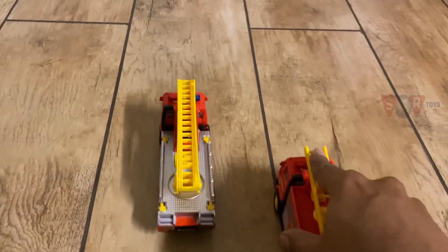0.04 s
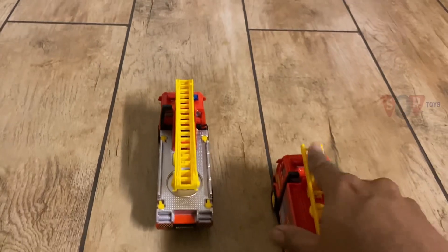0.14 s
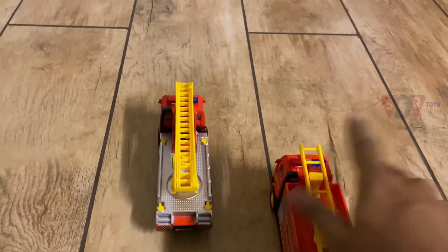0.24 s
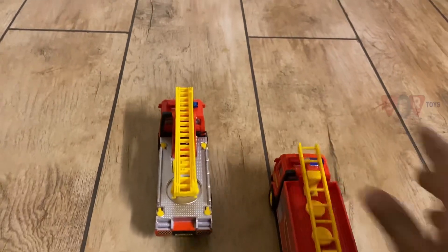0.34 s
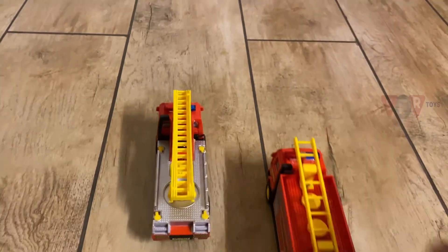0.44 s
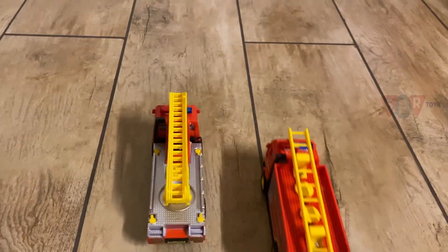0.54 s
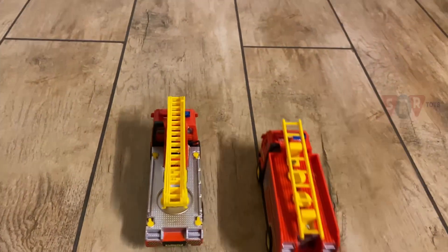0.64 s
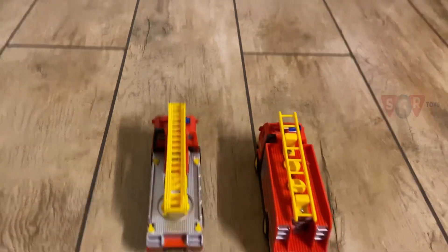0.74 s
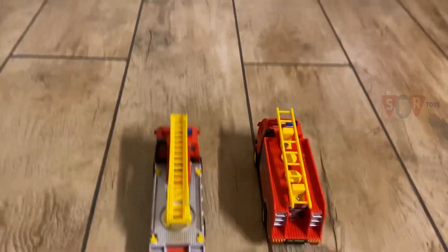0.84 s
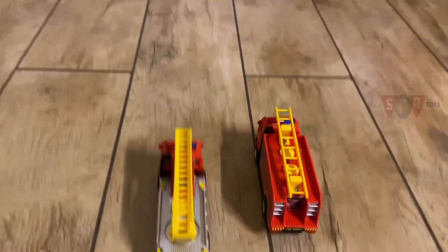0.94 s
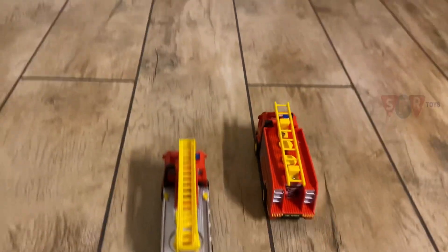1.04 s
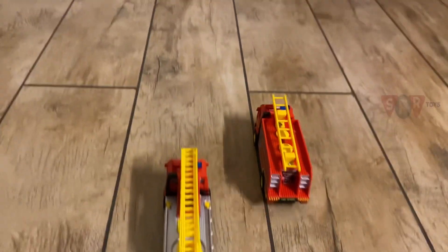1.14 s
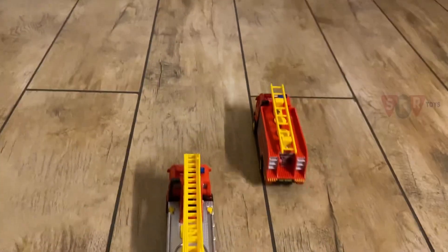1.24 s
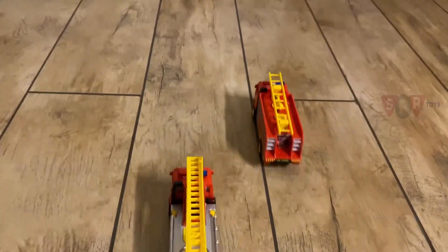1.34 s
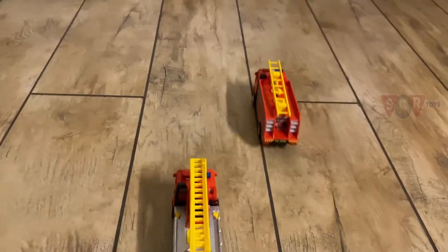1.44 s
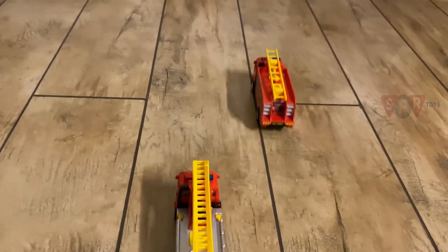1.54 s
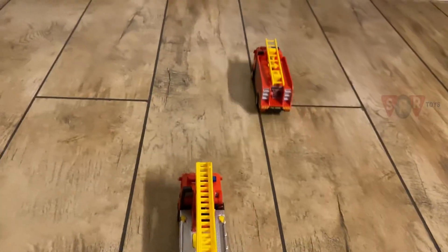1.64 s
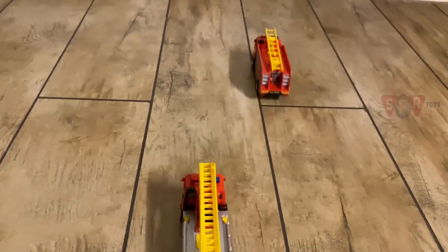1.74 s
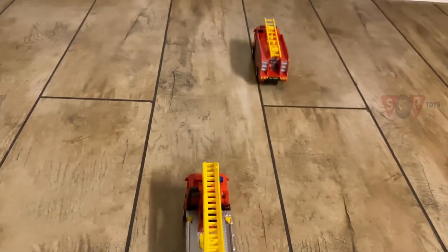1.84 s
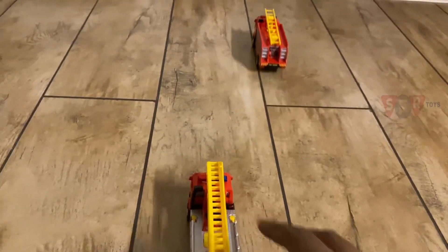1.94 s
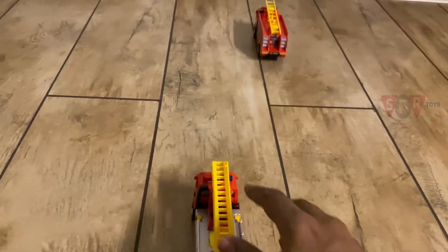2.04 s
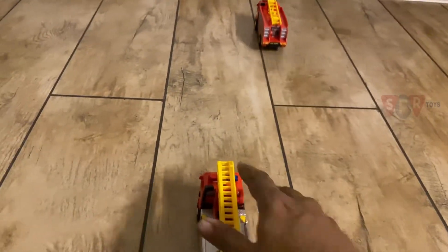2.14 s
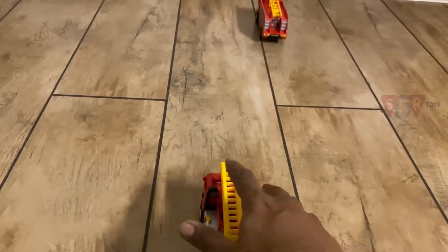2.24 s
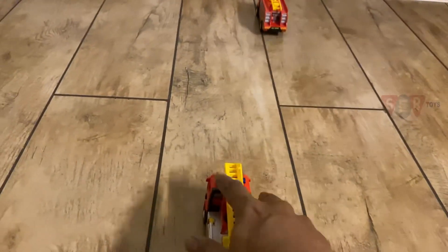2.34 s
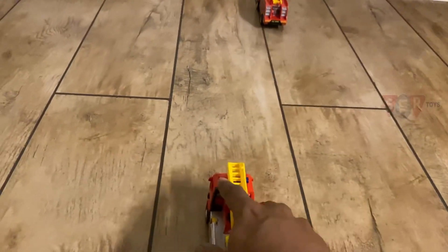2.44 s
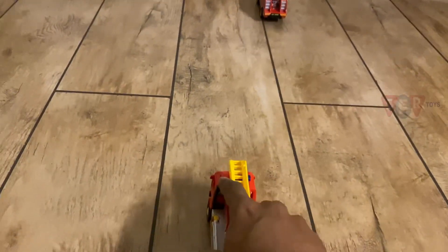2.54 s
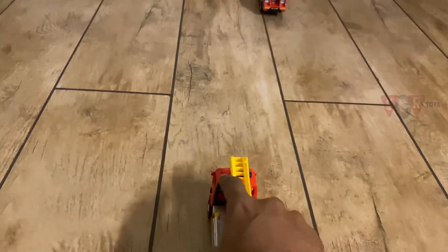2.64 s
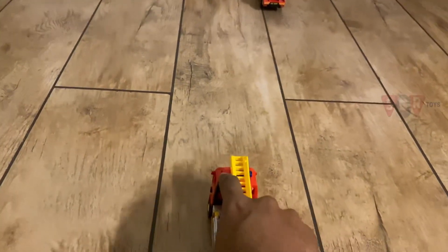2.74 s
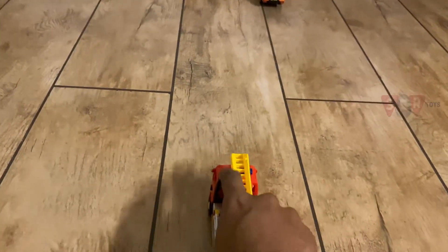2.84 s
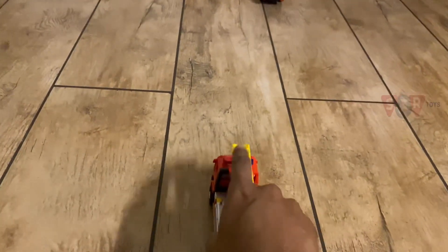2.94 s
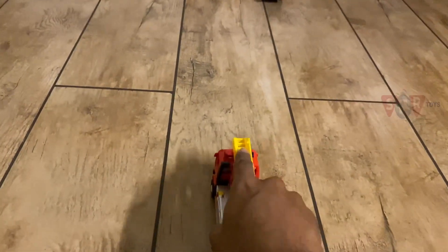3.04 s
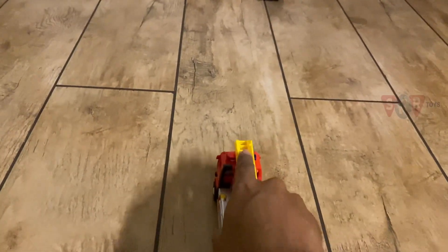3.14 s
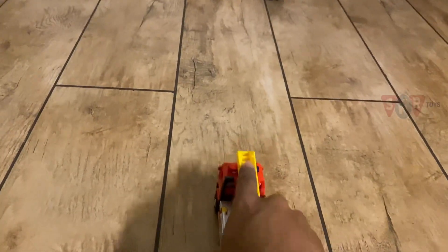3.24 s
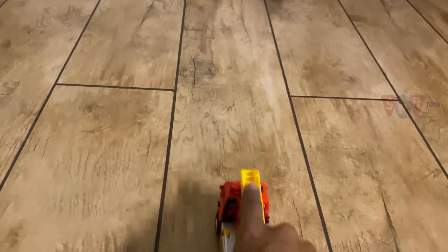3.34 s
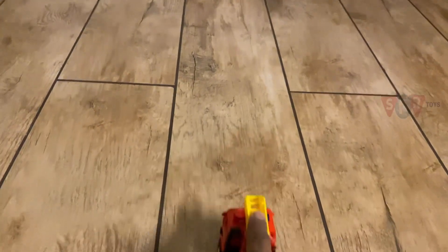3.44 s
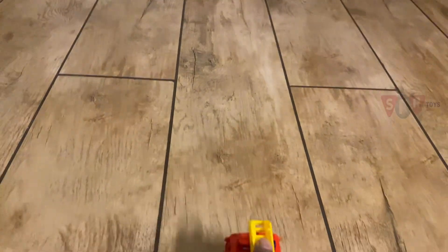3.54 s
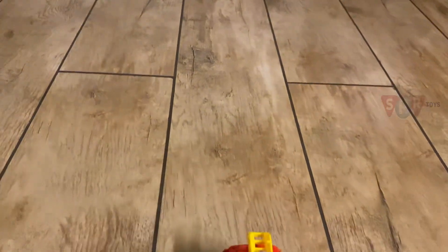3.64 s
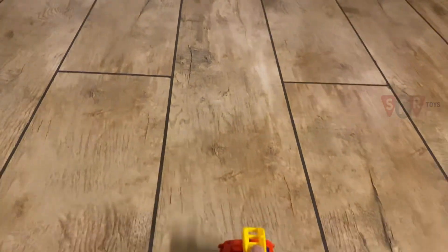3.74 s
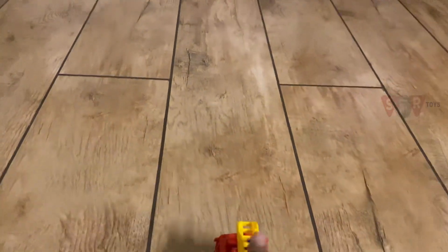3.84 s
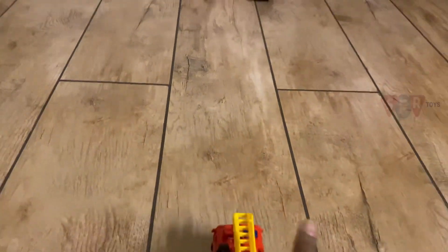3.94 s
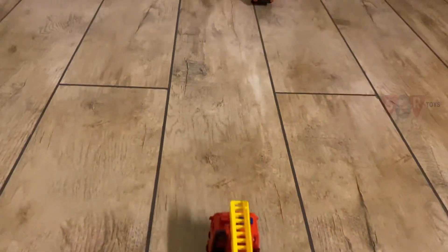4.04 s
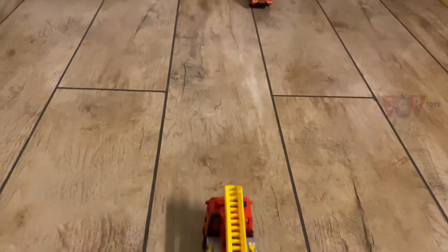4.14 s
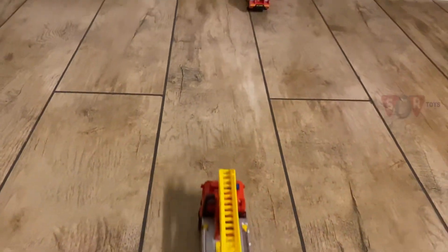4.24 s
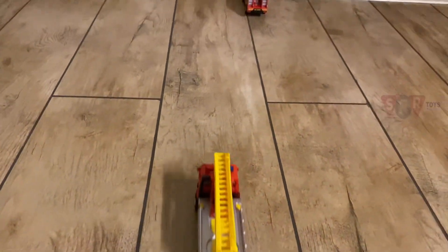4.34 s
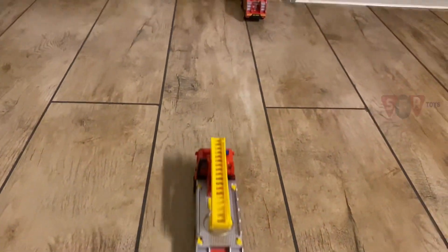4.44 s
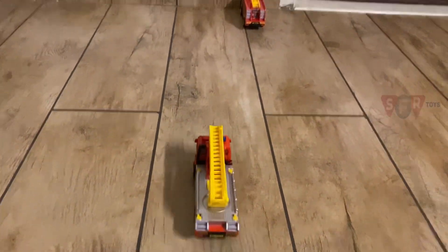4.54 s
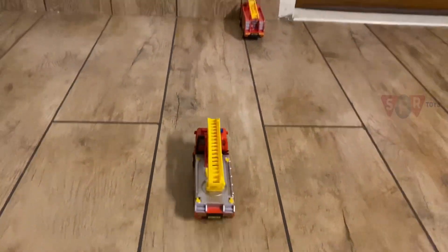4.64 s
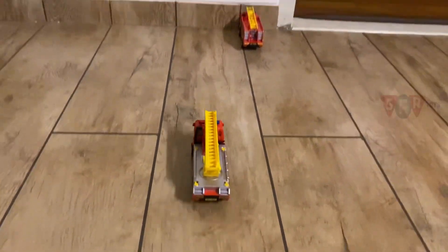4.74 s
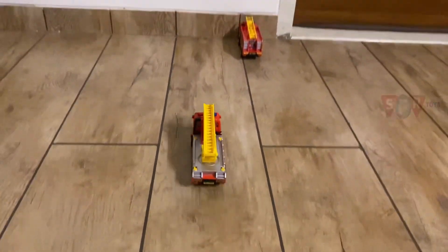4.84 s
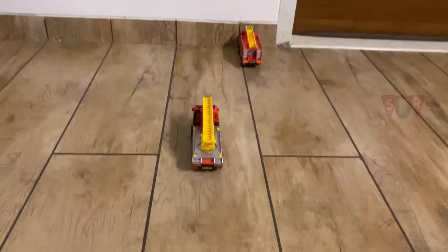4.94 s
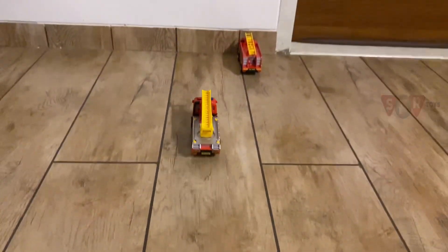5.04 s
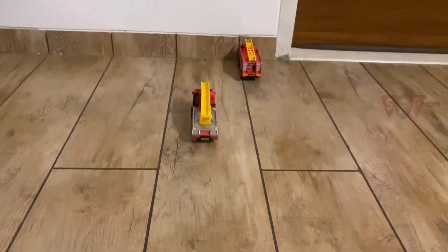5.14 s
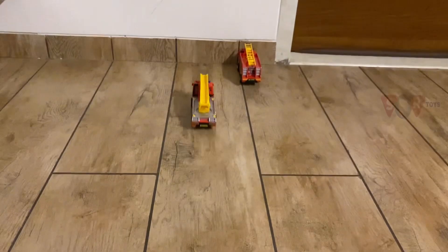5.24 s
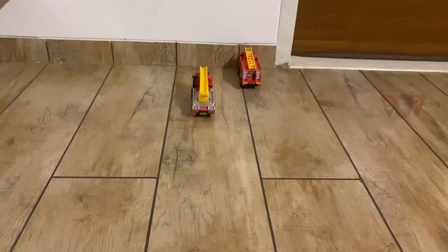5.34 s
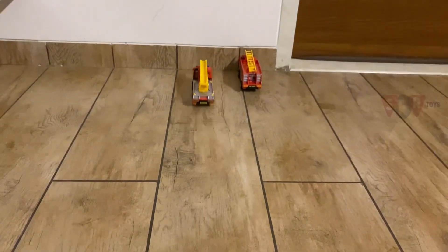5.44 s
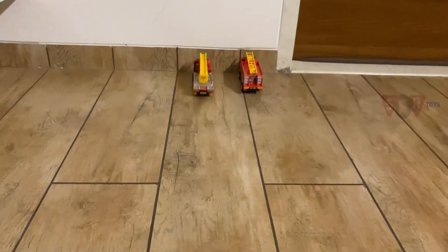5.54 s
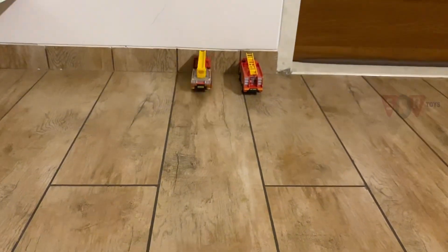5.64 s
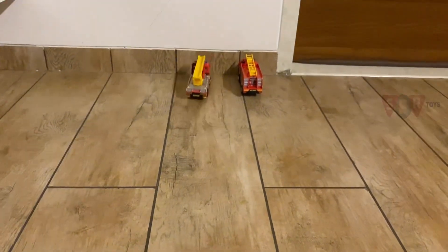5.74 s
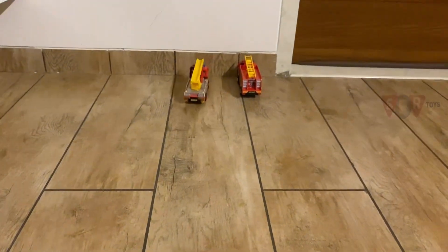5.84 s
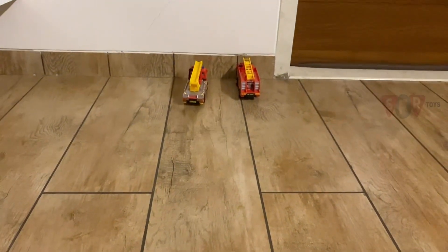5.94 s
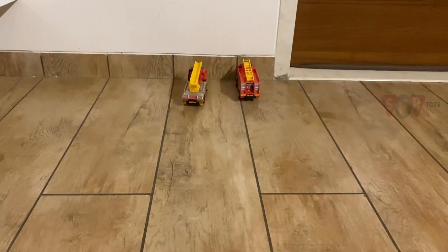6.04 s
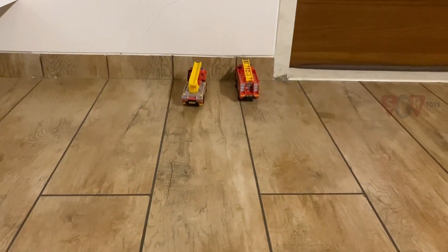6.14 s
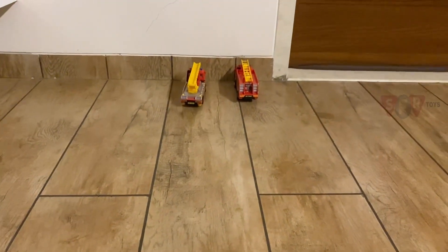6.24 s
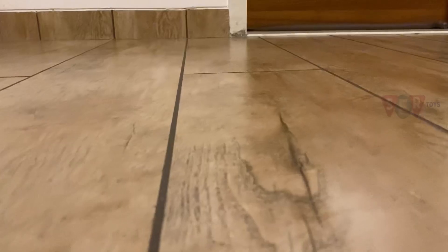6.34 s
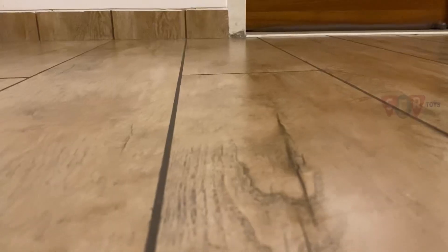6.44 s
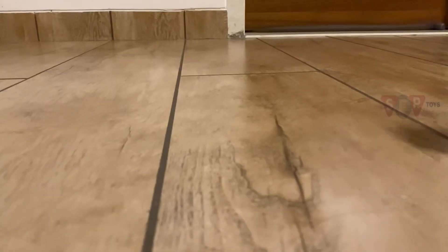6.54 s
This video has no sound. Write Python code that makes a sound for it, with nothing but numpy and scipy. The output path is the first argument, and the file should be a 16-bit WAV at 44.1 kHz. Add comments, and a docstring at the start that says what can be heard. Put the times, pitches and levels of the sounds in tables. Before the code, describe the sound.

Indoor toy truck runs on floor tiles: first loose, uneven clacking with bright gear ticks, slowing to single clicks; next a short burst of winding ratchet and a small release click; then a tighter, damped rattle ending in a hard plastic crack with short room echo. Faint low room rumble lies underneath. Finally a low, smoother roll starts, leaning right.

```python
"""Pull-back toy trucks on tiles

Two toy trucks on a tiled floor in a hard room, close to a two-port phone microphone. The first rattles
away; the second is pressed, wound back, let go and knocks into the skirting. At the end a third run
starts, heard from floor level. Clicks are short modal rings with bright noise ticks, rolling is dense
chatter plus smooth noise, and the room is a tail of sparse echoes. Filtered noise gives a low rumble,
which stops just before the third run, and quiet air throughout."""
import sys
import numpy as np
from scipy import signal
from scipy.fft import rfft, irfft
from scipy.io import wavfile
from scipy.ndimage import uniform_filter1d

SR = 44100
rng = np.random.default_rng(int(sys.argv[2]) if len(sys.argv) > 2 else 0)


def decibels_to_gain(level_db):
    """Convert a level in decibels to a linear amplitude gain (20 dB per decade)."""
    exponent = np.asarray(level_db, float) / 20
    return 10 ** exponent


def materialize(psi):
    """Save the field psi as 16-bit PCM at rate SR to the path in sys.argv[1].

    A 1-D psi becomes a single channel; in a 2-D psi each row is a channel.
    """
    bounded = np.clip(np.atleast_2d(psi).T, -1, 1)
    quanta = np.round(bounded * 32767).astype(np.int16)
    wavfile.write(sys.argv[1], SR, quanta)


N = 291060  # samples
GRAIN = 2048  # samples in one ring, tick or pulse

# three low bands of the background: (t/s, deep level/dB, hum level/dB, low-mid level/dB)
RUMBLE = [(0.0, -78, -75, -76.5), (0.14, -70, -81, -81), (0.2, -53.5, -72, -88), (0.27, -50, -78, -72.5),
          (0.65, -64, -68.5, -77), (1.65, -66.5, -70, -68.5), (2.3, -66, -68.5, -72),
          (2.75, -63.5, -68.5, -82), (2.87, -62, -70, -72), (3.2, -72, -71, -82.5), (3.4, -59, -63.5, -63),
          (3.65, -70.5, -65.5, -81.5), (3.9, -61.5, -68.5, -73), (4.44, -64.5, -64, -71.5),
          (4.9, -67, -64.5, -85), (5.63, -68.5, -59.5, -77), (5.8, -63.5, -70, -76), (6.03, -64, -60, -79),
          (6.28, -67.5, -76.5, -82.5), (6.33, -72, -81, -78.5)]
# colour of the quiet air: (f/Hz, relative level/dB)
AIR_COLOUR = [(120, -33.5), (200, 6.5), (299, 6), (360, -30.5), (612, -31), (659, -7.5), (1840, -14.5),
              (16000, -29.5)]
AIR_DB = -78.5
# how fast the room dies away: (f/Hz, t60/s)
ROOM_DECAY = [(100, 1), (260, 0.3), (700, 0.53), (1840, 0.48), (4850, 0.51), (12800, 0.33)]

# likeness of the two microphone ports: (f/Hz, likeness 0 to 1)
PORT_LIKENESS = [(60, .9), (200, .88), (500, .4), (1400, .65), (3000, .7), (5500, .4), (7600, .96),
                 (16000, .96)]
# phase by which the left port leads: (f/Hz, phase/rad)
LEFT_LEAD = [(0, 0), (1300, -.2), (3500, .9), (6600, -.2), (7700, -1.3), (8500, -np.pi), (9300, -5),
             (11000, -6.6), (12300, -8.2), (13500, -3 * np.pi), (14600, -10.8), (17000, -13)]
# level of the left port over the right: (f/Hz, level/dB)
LEFT_OVER_RIGHT = [(60, 3.5), (160, 1), (450, 2), (1400, 1.5), (3000, 1), (5500, 3.5), (8000, 0),
                   (16000, 0)]

# body resonances before detuning and damping: (f/Hz, width/Hz, level/dB)
FIRST_TRUCK = [(574, 200, -17.5), (880, 330, -2.5), (1109, 81, 1), (1391, 35, 4), (1573, 35, -3.5),
               (1798, 123, -2), (2380, 54, -5.5), (2675, 133, 3), (3320, 100, -11.5), (5140, 250, -33),
               (6900, 1100, -2)]
# chassis of the second truck: (f/Hz, width/Hz, level/dB)
SECOND_CHASSIS = [(811, 31, -3), (1348, 200, 10), (2010, 87, 1.5), (2440, 67, 2.5), (2860, 99, 4),
                  (4500, 73, -11), (5700, 590, -22), (7000, 260, -16)]
# the second truck's shell, heard while winding: (f/Hz, width/Hz, level/dB)
SECOND_SHELL = [(1190, 100, -2.5), (1630, 140, 8), (2200, 480, -1.5), (2740, 570, -1), (4520, 160, 0.5),
                (7360, 330, -5)]
# the truck of the third run: (f/Hz, width/Hz, level/dB)
THIRD_TRUCK = [(163, 91, -1), (456, 120, 8.5), (1340, 850, -2.5), (2490, 95, -3.5), (3540, 340, -2.5),
               (5900, 700, -17.5), (6200, 450, -11)]
# bumper on the skirting: (f/Hz, width/Hz, level/dB)
BUMPER = [(1370, 150, -6), (1680, 550, 1.5), (2120, 230, -6.5), (2870, 250, 1.5), (4580, 260, -12.5),
          (7200, 500, -21.5)]

# colour of hard plastic on plastic: (f/Hz, relative level/dB)
TICK_COLOUR = [(300, -26.5), (1000, -7.5), (2500, -3), (4000, -1), (7000, -3), (10500, -3), (12500, -8),
               (14500, -7.5), (16000, -13.5), (17000, -58.5)]
# what the knock sends into the room: (f/Hz, relative level/dB)
CRASH_COLOUR = [(100, -23.5), (160, -7.5), (300, -11.5), (600, -19), (1050, -12.5), (1180, 4), (1400, -5),
                (1670, 2), (1950, -6.5), (2300, -6.5), (2650, -2.5), (2910, 4), (3150, -4), (3700, -7.5),
                (4520, -1.5), (4700, -4), (4910, -5.5), (6800, -10.5), (10500, -10), (13000, -15.5),
                (16000, -27.5), (17000, -68)]

# loudest clacks, wheels jolting on the tiles and the hand on the body:
# (t/s, ring level/dB, tick level/dB, favoured f/Hz)
FIRST_CLICKS = [(0.093, -51, -73, 930), (0.104, -41, -53.5, 1370), (0.637, -46, -73, 1390),
                (0.705, -44, -56.5, 2550), (0.724, -46.5, -65, 1400), (0.782, -47, -61, 2680),
                (0.813, -46, -57, 1430), (0.869, -55, -67, 1370), (0.899, -40, -68, 1440),
                (0.963, -41.5, -62, 1380), (1.001, -39.5, -54, 1410), (1.028, -38.5, -61, 2440),
                (1.049, -40, -61, 2770), (1.067, -41, -61, 2790), (1.092, -40.5, -70, 2750),
                (1.1, -38, -55, 2450), (1.118, -35, -54, 2680), (1.243, -44, -57, 2530),
                (1.288, -37.5, -61, 1780), (1.303, -31.5, -51.5, 2700), (1.333, -36, -61, 1370),
                (1.356, -42, -58, 2710), (1.384, -44, -52, 1420), (1.445, -37, -59, 2660),
                (1.495, -43.5, -62, 2710), (1.528, -43, -62, 1430), (1.557, -39.5, -60, 2770),
                (1.62, -33.5, -55, 2690), (1.641, -33, -61, 2760), (1.683, -39, -57, 2760),
                (1.749, -34.5, -56, 2620), (1.789, -46, -64, 1800), (1.859, -44.5, -62, 2720),
                (1.893, -39.5, -56, 2670), (1.914, -44, -64, 2700), (1.956, -52, -74, 2780),
                (1.981, -45, -76, 1410), (1.999, -42, -62, 1630), (1.998, -43, -60, 1430),
                (2.051, -36, -59, 2710), (2.069, -37, -60, 2780), (2.134, -37.5, -59, 2770),
                (2.153, -40, -56, 1440), (2.186, -40, -68, 2690), (2.208, -41, -62.5, 2530),
                (2.256, -35.5, -56.5, 2700), (2.336, -38, -54, 2820), (2.468, -44, -73, 2720),
                (2.515, -41, -67, 2730), (2.56, -53, -61, 1580), (2.638, -63, -62, 1370),
                (2.674, -55, -57, 1380), (2.903, -52, -59, 1580), (2.932, -41, -58.5, 2820)]
# the ratchet while winding, then the release: (t/s, ring level/dB, tick level/dB, favoured f/Hz)
WINDING_CLICKS = [(3.187, -58, -74, 1620), (3.192, -56, -67, 3600), (3.214, -50, -59, 1600),
                  (3.245, -50, -76, 1200), (3.282, -49, -48, 1640), (3.329, -34.5, -58, 2200),
                  (3.354, -42, -45, 1660), (3.373, -34, -40.5, 1630), (3.426, -41.5, -45, 1640),
                  (3.462, -35, -59, 1570), (3.481, -41, -76, 1640), (3.509, -36, -64, 1680),
                  (3.539, -43, -65, 1700), (3.546, -33, -56, 1710), (3.555, -49, -48.5, 2200),
                  (3.576, -51, -54.5, 4500), (3.606, -58, -52, 4400), (3.618, -57, -51, 4500),
                  (3.634, -49, -58, 4500), (3.808, -46, -52.5, 2740), (3.812, -45, -74, 1190),
                  (3.829, -48, -62, 4450), (3.841, -52.5, -68.5, 1600)]
# clacks of the second run: (t/s, ring level/dB, tick level/dB, favoured f/Hz)
SECOND_CLICKS = [(4.567, -46, -53, 1340), (4.662, -41, -63, 2480), (4.701, -35.5, -45, 3500),
                 (4.712, -32, -48, 2384), (4.726, -41, -60, 2500), (4.826, -43, -66, 2530),
                 (4.836, -31.5, -47, 2390), (4.913, -44.5, -52, 2440), (4.951, -33, -49, 1990),
                 (5.06, -37.5, -51, 2500), (5.062, -37.5, -68, 1310), (5.162, -33.5, -46.5, 2800),
                 (5.262, -37, -51, 2590), (5.329, -43, -56, 2540), (5.362, -40, -49.5, 2720),
                 (5.402, -44, -62.5, 1443), (5.452, -39.5, -56.5, 1300), (5.51, -43.5, -58.5, 2480),
                 (5.564, -45.5, -56.5, 2450)]
# clacks of the third run: (t/s, ring level/dB, tick level/dB, favoured f/Hz)
THIRD_CLICKS = [(6.392, -43.5, -75, 2500), (6.537, -41, -69, 2500), (6.543, -45, -79, 2500)]
# bumper meets skirting, then the body slaps down:
# (t/s, ring level/dB, tick level/dB, favoured f/Hz, tilt/dB per octave)
KNOCKS = [(5.6056, -22, -27.5, 2870, -0.5), (5.606, -12, -43.5, 2870, 2.5), (5.6093, -14, -37, 1674, -5.5),
          (5.614, -29.5, -39, 4580, 1), (5.615, -28.5, -46.5, 1670, -1.5)]

# gear teeth click past, quicker as the truck gains speed, slower as it coasts: (teeth passed, t/s)
FIRST_GEAR = [(0, .383), (1, .462), (2, .522), (3, .57), (7, .745), (9, .812), (15, .972), (20, 1.116),
              (25, 1.239), (71, 2.211), (78, 2.378), (82, 2.494), (85, 2.596), (88, 2.72), (90, 2.846),
              (91, 2.888), (94, 3.031)]
# gear of the second run: (teeth passed, t/s)
SECOND_GEAR = [(0, 3.937), (1, 3.993), (3, 4.085), (4, 4.12), (10, 4.301), (15, 4.426), (17, 4.469),
               (22, 4.566), (24, 4.62), (54, 5.328), (59, 5.442), (62, 5.509), (65, 5.594)]
# gear of the third run: (teeth passed, t/s)
THIRD_GEAR = [(0, 6.342), (2, 6.409), (4, 6.473), (5, 6.5), (8, 6.589)]

# rolling: (t/s, rattle level/dB, tyre and gear hiss level/dB, gear tick level/dB)
FIRST_ROLL = [(0.0, -71, -73, -70), (0.19, -101, -114, -70), (0.29, -70, -68.5, -69),
              (0.39, -67.5, -58, -56.5), (0.59, -60.5, -58.5, -62), (0.77, -58, -93, -60),
              (0.92, -62, -59, -65), (1.31, -58, -60.5, -61), (1.55, -52.5, -55, -78),
              (1.81, -57, -55, -74), (2.2, -59.5, -57, -64.5), (2.35, -66, -64, -59.5),
              (2.65, -66.5, -61, -66), (2.82, -73, -65, -65), (3.0, -71.5, -63.5, -57.5),
              (3.12, -101, -99, -59)]
# second run: (t/s, rattle level/dB, tyre and gear hiss level/dB, gear tick level/dB)
SECOND_ROLL = [(3.93, -71, -70, -64), (4.046, -61, -61, -53), (4.166, -60.5, -59, -59),
               (4.5, -59.5, -67.5, -54.5), (4.78, -57.5, -55, -60.5), (5.034, -57, -57, -59.5),
               (5.599, -55.5, -52.5, -57)]
# third run: (t/s, rattle level/dB, tyre and gear hiss level/dB, gear tick level/dB)
THIRD_ROLL = [(6.338, -74, -89, -70), (6.356, -63, -76, -59.5), (6.45, -60, -81, -58),
              (6.524, -55.5, -73, -55), (6.6, -58.5, -83, -57.5)]
# chatter while winding: (t/s, rattle level/dB, hiss level/dB)
WINDING_ROLL = [(3.183, -72, -73), (3.21, -61.5, -66), (3.27, -60.5, -63), (3.29, -53, -53.5),
                (3.376, -49, -56), (3.492, -52.5, -53), (3.56, -56.5, -56), (3.64, -72, -60.5),
                (3.75, -88, -89), (3.797, -60.5, -73), (3.805, -77, -80), (3.93, -88, -85)]


def evened(x):
    """Brings a sound to an rms of 1."""
    return x / np.sqrt(np.mean(x ** 2) + 1e-20)


def read(points, hz):
    """Reads a curve between its points along a logarithmic frequency axis."""
    f, value = np.transpose(points)
    return np.interp(np.log(hz + 1), np.log(f + 1), value)


def add(mix, s, sound):
    """Lays a sound into the mix at s seconds, cut off at the end."""
    part = mix[:, round(s * SR):][:, :sound.shape[1]]
    part += sound[:, :part.shape[1]]


def coloured(x, gain):
    """Filters along the last axis by gain(hz)."""
    spectrum = rfft(x) * gain(np.fft.rfftfreq(x.shape[-1], 1 / SR))
    return irfft(spectrum, x.shape[-1])


def modal(modes, hz):
    """Power sum of resonance curves."""
    return np.sqrt(sum(decibels_to_gain(2 * db) / (1 + (2 * (hz - f) / w) ** 2) for f, w, db in modes))


def follow(rows, column):
    """A dB column as a gain at every sample, silent outside its rows."""
    rows = np.array(rows)
    t = np.arange(N) / SR
    return decibels_to_gain(np.interp(t, rows[:, 0], rows[:, column], left=-200, right=-200))


def rumble():
    """Deep wavering bands and the quiet air of the room, unrelated at two points."""
    noise = rng.standard_normal((4, 2, N))
    deep_modes = [(64.0, 36, 0)]  # (f/Hz, width/Hz, level/dB), here and below
    hum_modes = [(151.2, 10, -1.5), (120.0, 26, -5), (184, 37, -7.5)]
    low_modes = [(332, 840, 0)]
    deep = coloured(noise[0], lambda hz: modal(deep_modes, hz) ** 2 * (hz / np.hypot(hz, 55)) ** 4)
    hum = coloured(noise[1], lambda hz: modal(hum_modes, hz) ** 2)
    low_mid = coloured(noise[2], lambda hz: modal(low_modes, hz) ** 2)
    air = coloured(noise[3], lambda hz: decibels_to_gain(read(AIR_COLOUR, hz)))
    bands = sum(follow(RUMBLE, k) * evened(band) for k, band in enumerate((deep, hum, low_mid), start=1))
    return bands + decibels_to_gain(AIR_DB) * evened(air)


def room(x, early_db=-8.5, early_t60=0.073):
    """Sparse taps of random sign: strong echoes off floor and near walls, then a tail dying band by band."""
    taps = np.zeros((2, SR))
    at = np.arange(200, SR - 20, 20) + rng.integers(0, 20, (2, (SR - 201) // 20))
    np.put_along_axis(taps, at, rng.choice([-1., 1.], at.shape), 1)
    hz, t, z = signal.stft(taps, SR, nperseg=256)

    def fall(t60):
        return decibels_to_gain(-60 * t / t60)

    decay = fall(read(ROOM_DECAY, hz)[:, None]) + decibels_to_gain(early_db) * fall(early_t60)
    tail = signal.istft(z * decay, SR, nperseg=256)[1]
    return signal.fftconvolve(x[None], tail / np.linalg.norm(tail[0]), axes=1)[:, :N]


def ring(modes, damping, tilt_db=0, near_hz=None, focus_db=5.5, spread_db=3.0, blow_s=0.00026, scatter=0.7):
    """Each blow wakes the modes in other shares, all starting together; two paths, peak 1."""
    hz, width, db = np.transpose(modes)[:, :, None]
    share, detune, *phase = rng.standard_normal((4, len(modes), 1))
    t = np.arange(GRAIN) / SR
    # the second path is a quarter cycle on, give or take the scatter
    phase = scatter * np.array(phase) + np.array([0, np.pi / 2])[:, None, None]
    waves = np.sin(2 * np.pi * hz * (1 + 0.02 * detune) * t + phase)
    waves = waves * np.exp(-np.pi * damping * width * t)
    octaves_away = abs(np.log2(hz / near_hz)) if near_hz else 0
    tilt = tilt_db * np.log2(hz / hz[0])
    level = decibels_to_gain(db + spread_db * share + tilt - focus_db * octaves_away) * np.sqrt(width)
    sound = (level * waves).sum(1) * (1 - np.exp(-t / blow_s))
    return sound / abs(sound).max()


def tick(decay_s=0.0041):
    """Hard plastic on plastic: a brief broad puff; rms 1 over its first 10 ms."""
    t = np.arange(GRAIN) / SR
    noise = rng.standard_normal((2, len(t)))
    puff = coloured(noise, lambda hz: decibels_to_gain(read(TICK_COLOUR, hz))) * np.exp(-t / decay_s)
    return puff / np.sqrt(np.mean(puff[:, :SR // 100] ** 2))


def rebounds(sound, spread_s, loss_db=-6, first_db=-4, count=3):
    """A loose part strikes, then bounces a few times within some milliseconds."""
    when, size = rng.random((2, count))
    at = np.minimum(np.cumsum(when) * spread_s * SR, 1023).astype(int)
    blows = np.zeros((1, 1024))
    blows[0, at] = size * decibels_to_gain(first_db + loss_db * np.arange(count))
    blows[0, 0] = 1
    return signal.fftconvolve(sound, blows, axes=1)


def all_round(sound, blur_bins=15):
    """What a blow sends into the room: its spectrum averaged over directions, as one short pulse."""
    power = (abs(rfft(sound)) ** 2).mean(0)
    pulse = irfft(np.sqrt(abs(uniform_filter1d(power, blur_bins))))
    return np.roll(pulse, 128)[None]


def clicks(events, modes, damping, spread_s, snap_db):
    """A ring with a short snap and a tick for every click: two direct paths and the share for the room."""
    out = np.zeros((3, N))
    for s, ring_db, tick_db, near_hz, tilt_db in events:
        body = ring(modes, damping, tilt_db, near_hz)
        snap = ring([(near_hz, 0.62 * near_hz, 0)], 0.76)
        blow = decibels_to_gain(ring_db) * (body + decibels_to_gain(snap_db) * snap) + decibels_to_gain(tick_db) * tick()
        sound = rebounds(blow, spread_s)[:, :GRAIN]
        add(out, s, np.vstack([sound, all_round(sound)]))
    return out


def gear(teeth, rows, over_rattle_db, spread_db, mid_hz, octaves=0.53):
    """One click per tooth, ring set against the rattle and tick against its own column, give or take."""
    tooth, s = np.transpose(teeth)
    s = np.interp(np.arange(tooth[-1] + 1), tooth, s)
    t, rattle_db, _, tick_db = np.transpose(rows)
    ring_luck, tick_luck, pitch_luck = rng.standard_normal((len(s), 3)).T
    ring_db = np.interp(s, t, rattle_db) + over_rattle_db + spread_db * ring_luck
    click_db = np.interp(s, t, tick_db) + spread_db * tick_luck
    return np.c_[s, ring_db, click_db, mid_hz * 2 ** (octaves * pitch_luck)]


def tilted(events, tilt_db, rise_db_per_s):
    """Adds the tilt of the ring in dB per octave, shifting steadily with time."""
    events = np.array(events)
    return np.c_[events, tilt_db + rise_db_per_s * (events[:, 0] - events[0, 0])]


def rolling(rows, modes, per_s, uneven, size_db, smooth, damping, count=10):
    """Teeth and loose parts chatter into the body; wheels and gears add smooth noise."""
    gap, size, spot = rng.random((2500, 3)).T
    at = np.cumsum(SR / per_s * (1 + uneven * (-np.log(gap) - 1))).astype(int)
    inside = at < N
    # each of the count spots on the body has its own ring and tick
    train = np.zeros((count, N))
    train[(spot * count).astype(int)[inside], at[inside]] = decibels_to_gain(-size_db * np.log(size + 0.058))[inside]
    rings = sum(signal.oaconvolve(row[None], ring(modes, damping), axes=1)[:, :N] for row in train)
    ticks = sum(signal.oaconvolve(row[None], tick(), axes=1)[:, :N] for row in train)
    noise = rng.standard_normal((2, 2, N))
    drone = coloured(noise[0], lambda hz: modal(modes, hz))
    hiss = coloured(noise[1], lambda hz: decibels_to_gain(read(TICK_COLOUR, hz)))
    rattle = (1 - smooth) * evened(rings) + smooth * evened(drone)
    bright = (1 - smooth) * evened(ticks) + smooth * evened(hiss)
    return follow(rows, 1) * rattle + follow(rows, 2) * bright


def truck(events, rows, modes, room_db, sheen_db, click_damping, spread_s, snap_db, **motion):
    """Clicks over the rolling; sheen sets the top treble (more near by), room_db the room (more far away)."""
    hits = clicks(events, modes, click_damping, spread_s, snap_db)
    roll = rolling(rows, modes, **motion)
    paths = np.vstack([hits[:2] + roll, decibels_to_gain(room_db) * (hits[2] + roll[0])])
    return coloured(paths, lambda hz: decibels_to_gain(sheen_db * np.log2(1 + (hz / 9000) ** 2)))


def third_run():
    """Mostly smooth rolling over a low, broadly ringing body, with a few clacks."""
    teeth = gear(THIRD_GEAR, THIRD_ROLL, over_rattle_db=-5, spread_db=0.0, mid_hz=1500)
    hits = tilted([*THIRD_CLICKS, *teeth], tilt_db=4.0, rise_db_per_s=4.0)
    return truck(hits, THIRD_ROLL, THIRD_TRUCK, room_db=-7.5, sheen_db=1.0,
                 click_damping=0.74, spread_s=0.003, snap_db=-3,
                 per_s=260, uneven=0.62, size_db=-1.0, smooth=0.78, damping=0.97)


def first_run():
    """Loose, uneven chatter and clicking gear teeth ring the modes of the first body."""
    teeth = gear(FIRST_GEAR, FIRST_ROLL, over_rattle_db=7, spread_db=2.5, mid_hz=1910)
    hits = tilted([*FIRST_CLICKS, *teeth], tilt_db=1.0, rise_db_per_s=2.0)
    return truck(hits, FIRST_ROLL, FIRST_TRUCK, room_db=-5.5, sheen_db=-4.0,
                 click_damping=0.86, spread_s=0.006, snap_db=-9,
                 per_s=120, uneven=0.86, size_db=5.0, smooth=0.33, damping=1.0)


def winding():
    """The ratchet chatters nearly evenly into the shell, then the truck is released."""
    hits = tilted(WINDING_CLICKS, tilt_db=-4.5, rise_db_per_s=7.5)
    return truck(hits, WINDING_ROLL, SECOND_SHELL, room_db=-7.5, sheen_db=-1.5,
                 click_damping=0.92, spread_s=0.0041, snap_db=-16.5,
                 per_s=77, uneven=0.16, size_db=0.0, smooth=0.5, damping=0.45)


def second_run():
    """Dense chatter and clicking gear teeth in the more heavily damped chassis."""
    teeth = gear(SECOND_GEAR, SECOND_ROLL, over_rattle_db=4, spread_db=4, mid_hz=1900)
    hits = tilted([*SECOND_CLICKS, *teeth], tilt_db=5.5, rise_db_per_s=-0.5)
    return truck(hits, SECOND_ROLL, SECOND_CHASSIS, room_db=-4.5, sheen_db=-3.5,
                 click_damping=1.5, spread_s=0.0054, snap_db=-4.5,
                 per_s=250, uneven=0.49, size_db=10.0, smooth=0.62, damping=1.6)


def knock(room_db=11.0):
    """The blows on the skirting, small and thin in the bass; the room takes them as one pulse."""
    blows = clicks(KNOCKS, BUMPER, damping=0.62, spread_s=0.00075, snap_db=-14)
    blows = coloured(blows, lambda hz: hz / np.hypot(hz, 900))
    blows[2] = 0  # one pulse stands in for the separate room shares
    pulse = coloured(signal.unit_impulse(GRAIN, 128), lambda hz: decibels_to_gain(read(CRASH_COLOUR, hz)))
    add(blows[2:], KNOCKS[0][0] + 0.0057, decibels_to_gain(room_db) * pulse[None])
    return blows


def scene():
    """Every sound comes along two paths; the right port hears a blend of both."""
    *direct, sent = first_run() + winding() + second_run() + third_run() + knock()
    a, b = direct + room(sent) + rumble()

    def same(hz):
        return np.clip(read(PORT_LIKENESS, hz), 0, 1)

    right = coloured(a, same) + coloured(b, lambda hz: np.sqrt(1 - same(hz) ** 2))
    ports = np.array([a, right])
    # the third run comes from the right; the whole mix leans that way from its start
    ports[:, round(THIRD_ROLL[0][0] * SR):] *= decibels_to_gain(np.array([[-2.5], [2.5]]))
    return ports


def top_cut(x):
    """Nothing passes above the cut-off."""
    return signal.sosfilt(signal.butter(12, 17130, fs=SR, output="sos"), x)


def record(dry):
    """The two ports differ in phase and level with frequency."""
    hz, lead = np.transpose(LEFT_LEAD)

    def left_gain(f):
        return decibels_to_gain(read(LEFT_OVER_RIGHT, f) / 2) * np.exp(1j * np.interp(f, hz, lead))

    left = coloured(dry[0], left_gain)
    right = coloured(dry[1], lambda f: decibels_to_gain(-read(LEFT_OVER_RIGHT, f) / 2))
    return top_cut(np.array([left, right]))


dry = scene()
out = record(dry)
materialize(out)
```